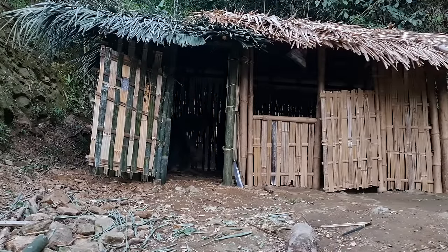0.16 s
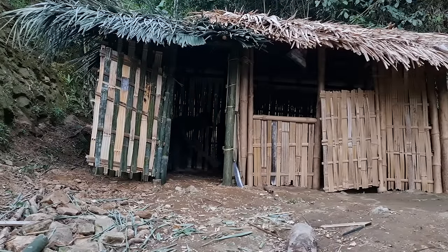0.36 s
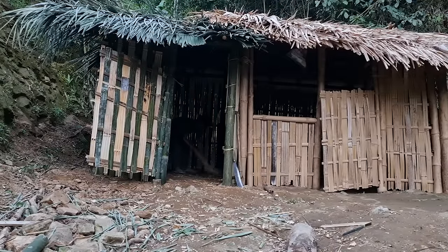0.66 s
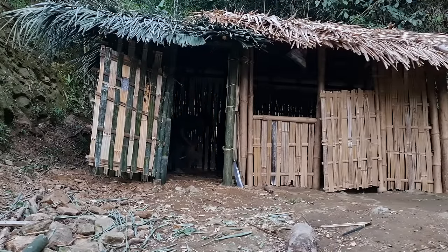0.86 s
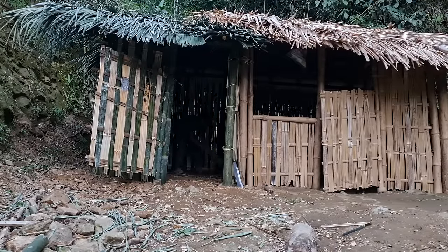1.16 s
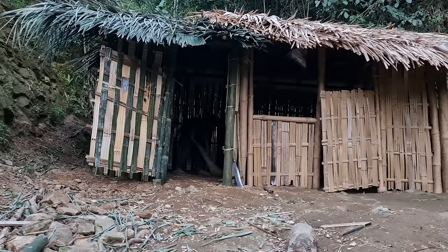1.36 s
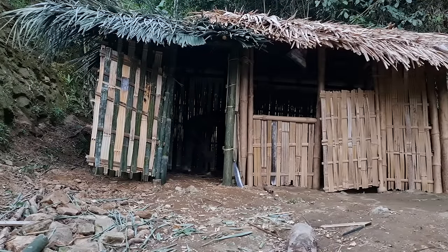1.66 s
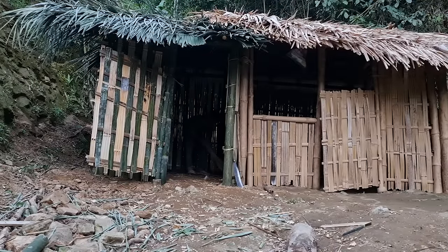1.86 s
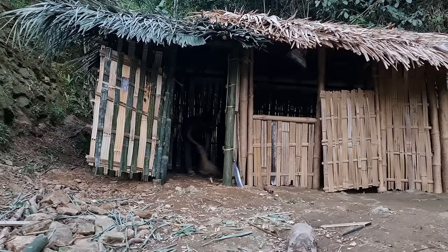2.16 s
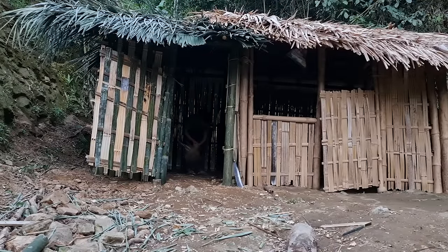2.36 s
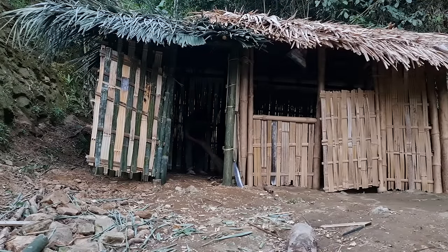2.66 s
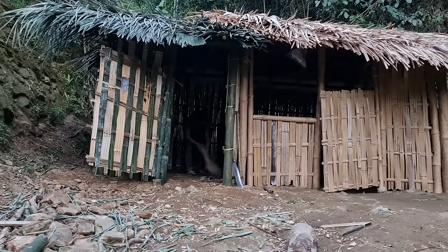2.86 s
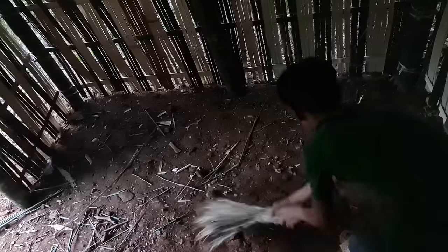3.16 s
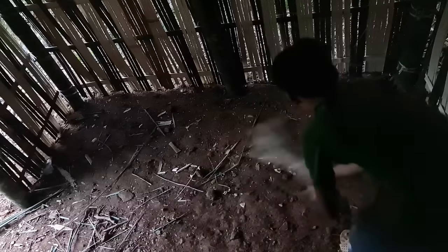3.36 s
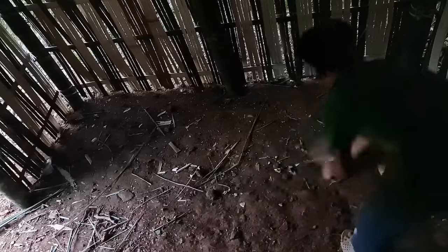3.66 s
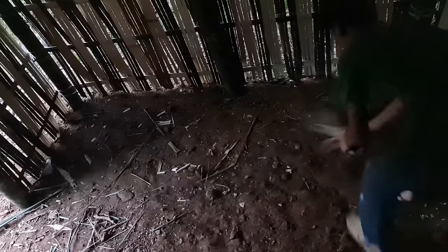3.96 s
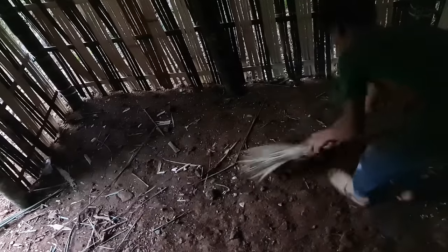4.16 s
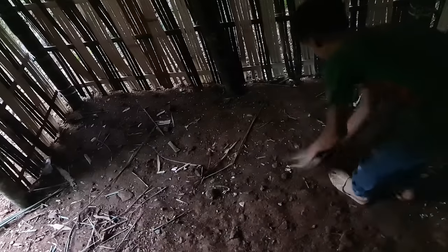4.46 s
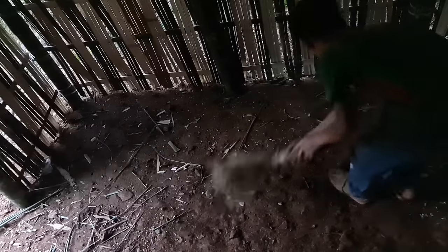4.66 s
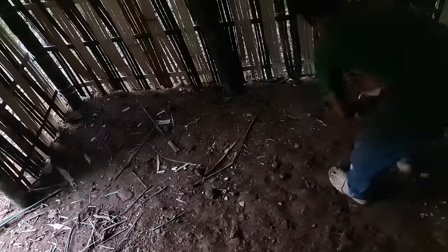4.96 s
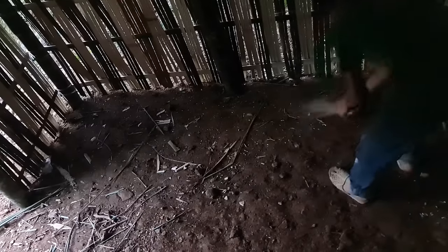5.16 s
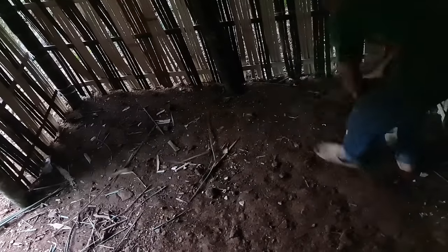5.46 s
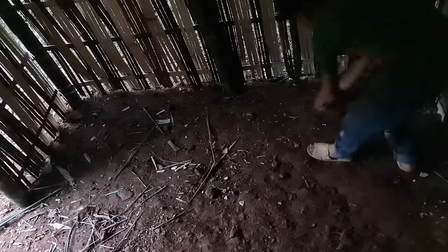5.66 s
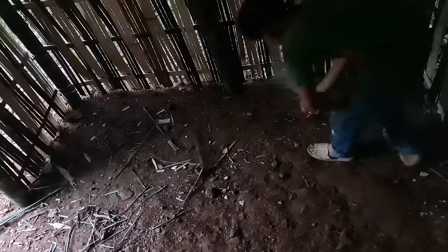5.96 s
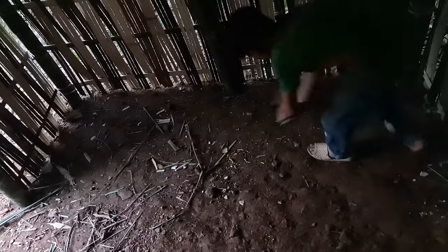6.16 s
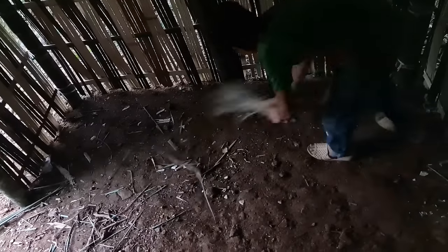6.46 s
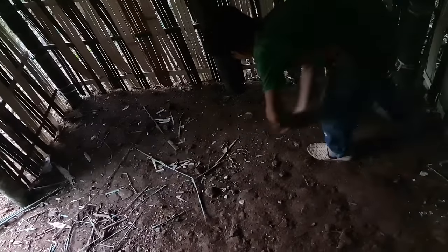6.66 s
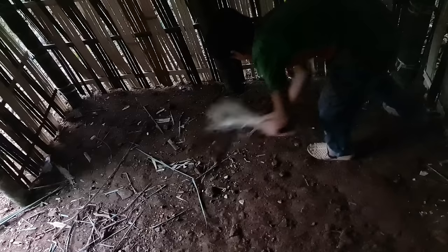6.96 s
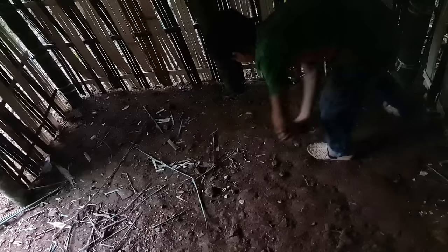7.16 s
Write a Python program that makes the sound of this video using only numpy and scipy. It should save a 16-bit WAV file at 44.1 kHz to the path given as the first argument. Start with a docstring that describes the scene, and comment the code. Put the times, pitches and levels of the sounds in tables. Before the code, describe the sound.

From a quiet yard with faint trilling insects, short straw-broom strokes come from inside a bamboo hut, with small knocks and twig snaps. Around three seconds the view jumps inside: the strokes become louder, close and crisp, scraping dry earth, with crackling leaves, ticking chips and a heavier thud near the end. Wide stereo microphone, little echo.

```python
"""Sweeping a hut floor

A short straw hand broom sweeps a dirt floor strewn with dry leaves and chips in a small bamboo hut.
The first strokes are heard from the yard, with insects trilling; then the listener is inside, close by.
Each stroke is a rush of random straw clicks over a duller scrape of earth, both following the broom's pressure.
Twigs snap and feet and clods thud as short noise bursts that ring; insects are pulsed tones and narrow noise."""
import sys
import numpy as np
from scipy import signal
from scipy.fft import rfft, irfft
from scipy.io import wavfile

SR = 44100
rng = np.random.default_rng(int(sys.argv[2]) if len(sys.argv) > 2 else 0)


def wav_record(signal):
    """Record a signal, one row per channel, as 16-bit PCM in the file named by sys.argv[1]."""
    frames = np.transpose(np.atleast_2d(signal))
    bounded = np.clip(frames, -1, 1)
    # unit amplitude maps onto the largest positive 16-bit level
    quanta = np.round(bounded * 32767).astype(np.int16)
    wavfile.write(sys.argv[1], SR, quanta)


N = 322812
TIME = np.arange(N) / SR
INSIDE_FROM_S = 2.912
# 0 in the yard, 1 in the hut, with a 2 ms crossfade
INSIDE = np.clip((TIME - INSIDE_FROM_S) * 500, 0, 1)

# full broom strokes: touch-down t/s, hardest push t/s, lift t/s, straw rustle level/dB, earth scrape level/dB,
# swell from touch-down to push/dB
STROKES = [(-0.033, 0.051, 0.098, -35.5, -43.5, 7.5), (0.592, 0.737, 0.81, -38.5, -47, 8.5),
           (1.311, 1.338, 1.46, -40.5, -48.5, 7), (1.437, 1.474, 1.457, -29.5, -38, 9),
           (2.066, 2.202, 2.228, -33, -41, 12.0), (2.836, 2.898, 2.925, -37.5, -46.5, 9),
           (3.034, 3.13, 3.212, -24.5, -34.5, 12), (3.664, 3.767, 3.86, -26.5, -36.5, 6.5),
           (4.072, 4.199, 4.252, -24.5, -35.5, 13.5), (4.504, 4.673, 4.677, -25.5, -38, 4.0),
           (5.093, 5.258, 5.303, -28.5, -41.0, 12), (5.679, 5.812, 5.897, -27.0, -39.5, 10),
           (6.185, 6.291, 6.46, -28, -42.5, 7), (6.727, 6.808, 7, -27.0, -38.5, 10.5),
           (7.224, 7.319, 7.36, -29.5, -39.5, 15)]
# how alike left and right are in the yard: f/Hz, correlation (-1 to 1)
YARD_LIKENESS = [(100, 0.79), (500, 0.57), (1500, 0.33), (4500, 0.12), (5600, -0.032), (8000, -0.31),
                 (10400, -0.015), (13000, -0.23)]


def from_db(db):
    """Turns decibels into an amplitude factor."""
    return 10 ** (np.asarray(db) / 20)


def rms_one(x):
    """Scales a sound to an average (rms) strength of 1."""
    return x / np.sqrt(np.mean(x ** 2) + 1e-20)


def at_hz(points):
    """Reads a table at every spectral line, along a log-frequency axis."""
    hz, value = np.transpose(points)
    line_hz = np.arange(N // 2 + 1) * SR / N
    return np.interp(np.log(line_hz + 1), np.log(hz), value)


def coloured(x, points):
    """Makes some frequencies of a sound stronger and others weaker, as a table says."""
    return irfft(rfft(x) * from_db(at_hz(points)), N)


def drift(rate):
    """A line wandering at random through a given number of points per second, with rms 1."""
    knots = rng.standard_normal(4000)
    return rms_one(np.interp(TIME * rate, np.arange(len(knots)), knots))


def blend(pair, likeness):
    """Mixes two signals into left and right; if they are unrelated, the sides get the given likeness."""
    mid, side = rfft(pair)
    alike = np.clip(at_hz(likeness), -.98, .98)
    shared = np.sqrt((1 + alike) / 2) * mid
    opposed = np.sqrt((1 - alike) / 2) * side
    return irfft(shared + opposed * [[1], [-1]], N)


def resonate(x, hz, width_hz):
    """A two-pole resonance: the sound rings around one frequency, with gain 1 at the top."""
    r = np.exp(-np.pi * width_hz / SR)
    forward = [(1 - r * r) / 2, 0, (r * r - 1) / 2]
    feedback = [1, -2 * r * np.cos(2 * np.pi * hz / SR), r * r]
    return signal.lfilter(forward, feedback, x + 1e-18)


def clicks(per_s, spread_db):
    """Random clicks of uneven size, drawn separately for two paths to the listener."""
    size_db = spread_db * np.minimum(rng.exponential(1, (2, N)), 4)
    sizes = from_db(size_db) * rng.choice([-1, 1], (2, N))
    happens = rng.random((2, N)) < per_s / SR
    return rms_one(sizes * happens)


def walls(pair, wet_db, t60, count=40):
    """The slatted walls return a short scatter of echoes, the later ones weaker."""
    delay = rng.uniform(.002, .06, (2, count))  # s
    heights = rng.choice([-1, 1], (2, count)) * from_db(-60 * delay / t60)
    response = np.zeros((2, SR // 8))
    for side in range(2):
        echoes = from_db(wet_db) * heights[side] / np.linalg.norm(heights[side])
        response[side, (delay[side] * SR).astype(int)] = echoes
    response[:, 0] = 1  # the direct sound
    return signal.fftconvolve(pair, response, axes=1)[:, :N]


def blow(t60, direct, count=13000):
    """One contact and the dense reflections that die away after it, by 60 dB in t60 seconds."""
    age = np.arange(count) / SR
    burst = rng.standard_normal((2, count)) * from_db(-60 * age / max(t60, .01))
    burst[:, 0] += direct
    return burst


def add(track, s, sound):
    """Lays a sound into a track at a time in seconds."""
    at = int(s * SR)
    track[:, at:at + sound.shape[1]] += sound[:, :N - at]


def broom():
    """Thousands of straws flick over grit; leaves and chips crackle among them; pressing down scrapes the earth."""
    # colour of the straws and leaves: f/Hz, gain/dB
    straw_colour = [(400, -33.5), (900, -17.5), (1400, -5.5), (2100, -5), (2900, -0.5), (4200, 0.5),
                    (7000, 1), (9200, -5.5), (11200, -4.5), (13000, -6), (16000, -9)]
    # colour of the scraped earth: f/Hz, gain/dB
    earth_colour = [(25, -47), (60, -30), (150, -11), (240, -11), (360, -0.5), (550, 1), (850, 3.5),
                    (1400, 5), (2100, 0.5), (2900, 2.5), (5000, -11), (12000, -15)]
    straw_level, earth_level = sweeping()
    # uneven pressure makes both levels flutter
    straw_level = straw_level * from_db(0.86 * drift(110))
    earth_level = earth_level * from_db(1.23 * drift(130))

    straws = coloured(clicks(per_s=14000, spread_db=2.5), straw_colour)
    leaf_clicks = walls(clicks(per_s=170, spread_db=3.5), wet_db=-1, t60=0.047)
    leaves = rms_one(coloured(leaf_clicks, straw_colour))
    grit = coloured(clicks(per_s=4000, spread_db=2.5), earth_colour)

    rush = from_db(-0.45) * straw_level * wander(straws, depth=0.36, rate=14)
    scrape = from_db(4.5) * earth_level * wander(grit, depth=0.67, rate=18)
    # loose litter keeps settling after the broom lifts, so its crackle falls off less than the rush
    stirred = (straw_level / straw_level.max()) ** 0.87
    crackle = from_db(-37) * leaves + from_db(-41.5) * chips(per_s=32)
    return rush + scrape + stirred * crackle


def sweeping():
    """Levels of straw rustle and earth scrape: strokes, settling litter and light drags add in power."""
    # light drags between strokes: touch-down t/s, length/s, straw rustle level/dB, earth scrape level/dB
    drags = [(1.609, 0.033, -55, -55.5), (2.3, 0.13, -57, -59), (3.352, 0.099, -40, -63.5),
             (4.326, 0.013, -41, -47.0), (4.402, 0.096, -39.5, -61.5), (4.846, 0.1, -36, -62),
             (5.586, 0.16, -44, -54), (6.11, 0.077, -37, -49), (6.688, 0.14, -38, -55),
             (7.181, 0.074, -48, -49)]
    # faint stirring of litter that never stops: straw rustle dB, earth scrape dB
    yard_stir_db, hut_stir_db = (-67, -84), (-47.5, -67.5)
    # swept litter goes on settling: dB against the stroke's peak, fall in dB per s
    settle_db, settle_db_per_s = -19, 36
    earth_follows = 1.33  # dB of scrape for each dB of rustle

    def power(straw_db, earth_db, shape_db):
        """Power of rustle and scrape as they follow one shape in time."""
        return from_db([straw_db + shape_db, earth_db + earth_follows * shape_db]) ** 2

    total = np.outer(from_db(yard_stir_db) ** 2, 1 - INSIDE)
    total += np.outer(from_db(hut_stir_db) ** 2, INSIDE)
    for touch, push, lift, straw_db, earth_db, swell_db in STROKES:
        # a stroke sounds only in the place where it began
        heard = INSIDE if touch > INSIDE_FROM_S else 1 - INSIDE
        settling_db = settle_db - settle_db_per_s * np.maximum(TIME - lift, 0)
        total += heard * power(straw_db, earth_db, contact_db(touch, push, lift, swell_db))
        total += heard * (TIME > push) * power(straw_db, earth_db, settling_db)
    for touch, length, straw_db, earth_db in drags:
        total += power(straw_db, earth_db, contact_db(touch, touch, touch + length, 0))
    return np.sqrt(total)


def contact_db(touch, push, lift, swell_db):
    """The broom lands, swells to its hardest push, eases and lifts: dB against its peak."""
    landing_db_per_s, ease_db, lift_db_per_s = 800, 5, 198
    pressed = np.interp(TIME, [touch, push, lift], [-swell_db, 0, -ease_db])
    before_landing = landing_db_per_s * np.maximum(touch - TIME, 0)
    after_lift = lift_db_per_s * np.maximum(TIME - lift, 0)
    return pressed - before_landing - after_lift


def wander(x, depth, rate, count=22):
    """As the broom travels, the hut's reflections lift and sink narrow bands of its sound."""
    centres_hz = np.geomspace(330, 4600, count)
    bands = sum(drift(rate) * resonate(x, hz, 0.077 * hz) for hz in centres_hz)
    return rms_one(x + depth * bands)


def chips(per_s, count=10):
    """Chips and leaf stalks tumble, each tick ringing at one of several pitches."""
    ticks = clicks(per_s, spread_db=1.0)
    dealt = rng.integers(0, count, N)  # which pitch each tick gets
    pitches_hz = np.geomspace(1100, 8500, count)
    rings = sum(resonate(ticks[0] * (dealt == k), hz, 0.075 * hz) for k, hz in enumerate(pitches_hz))
    return rms_one(walls(np.array([rings, rings]), wet_db=-1, t60=0.074))


def cracks():
    """Twigs snap and straw tips tick: a fast-rising noise burst rings broadly around a pitch of its own."""
    # twigs and chips cracking, plus a duller tick as the broom lands at 2.836 s: t/s, level/dB, centre f/Hz
    snaps = [(0.3713, -44.5, 1330), (0.988, -47.5, 3020), (1.072, -29.5, 2280), (1.7894, -39, 3100),
             (1.84, -36.5, 5530), (2.2637, -30.5, 1400), (2.351, -41, 2870), (2.4054, -44.5, 1140),
             (2.836, -41, 1220), (3.386, -24.5, 6860), (3.4199, -16.5, 6000), (3.533, -17.5, 3000),
             (3.6042, -28.5, 3900), (4.0356, -28.5, 5350), (4.4343, -33.5, 1430), (4.796, -27.5, 4950),
             (4.861, -24, 3800), (4.9089, -18.5, 6100), (5.4011, -34.5, 4600), (5.4983, -36.5, 6000),
             (5.5483, -25.5, 5100), (6.115, -37, 7300), (6.49, -34, 1920), (6.617, -36.5, 2400),
             (6.969, -26, 6000), (7.0254, -21, 1470), (7.1824, -23.5, 5470)]
    # the straw tips tick as each stroke lands
    tip_db, tip_hz = -39.5, 6000
    tips = [(touch, tip_db, tip_hz) for touch, *_ in STROKES if touch > 0]
    out = np.zeros((2, N))
    for s, level_db, hz in snaps + tips:
        burst = blow(t60=0.13, direct=3.9)
        rise_s = 0.0011 * (hz / 6500) ** 2
        age = np.arange(1, burst.shape[1] + 1) / SR
        burst = burst * (1 - np.exp(-age / rise_s))
        ring = resonate(burst, hz, 0.78 * hz) + from_db(-12.0) * burst
        band = signal.butter(2, [700, min(2.7 * hz, .4 * SR)], "band", fs=SR, output="sos")
        ring = signal.sosfilt(band, ring)
        strength = ring[:, :SR // 100].std()  # over the first 10 ms
        add(out, s, from_db(level_db - 10.0) * ring / strength)
    return out


def thuds():
    """A soft contact sets earth and bamboo ringing, most near its own pitch; low modes die last."""
    # feet, clods and broom head knocking on floor and wall: t/s, level/dB, contact f/Hz,
    # time to fall 60 dB/s (for a mode at 550 Hz)
    knocks = [(0.108, -44, 417, 0.12), (0.371, -61.5, 1330, 0.23), (0.906, -37, 624, 0.14),
              (1.074, -42, 640, 0.19), (1.23, -59.5, 499, 0.24), (1.774, -59, 387, 0.14),
              (2.262, -32, 610, 0.15), (2.309, -41, 616, 0.1), (2.4, -52.5, 630, 0.14),
              (2.543, -57.5, 428, 0.14), (3.422, -50, 700, 0.27), (3.531, -42.5, 1840, 0.13),
              (3.601, -44, 576, 0.31), (3.966, -46, 2300, 0.097), (4.433, -36, 1390, 0.21),
              (4.86, -40, 625, 0.19), (5.007, -53, 171, 0.18), (5.349, -45.5, 633, 0.13),
              (6.49, -36.5, 660, 0.11), (7.0243, -20.5, 690, 0.17), (7.036, -26, 347, 0.18)]
    # what a knock rings with: f/Hz, width/Hz, level/dB
    modes = [(189, 28, -8.5), (385, 125, -8.5), (488, 130, -0.5), (615, 73, 2), (783, 140, 0),
             (906, 73, -8), (1220, 140, -3), (1780, 720, -6)]
    out = np.zeros((2, N))
    for s, level_db, hz, t60 in knocks:
        band = signal.butter(2, [min(0.39 * hz, 290), 2.0 * hz], "band", fs=SR, output="sos")
        soften = signal.butter(2, 2.27 * hz, fs=SR, output="sos")
        contact = np.vstack([band, soften])
        ring = 0
        for mode_hz, width_hz, db in modes:
            mode_t60 = t60 * (550 / mode_hz) ** 0.5
            push = signal.sosfilt(contact, blow(mode_t60, direct=rng.choice([-1, 1]) * 6.1))
            octaves_away = abs(np.log2(mode_hz / hz))
            strength = from_db(db - 2.2 * octaves_away + rng.normal(0, 0.67))
            ring = ring + strength * resonate(push, mode_hz, width_hz)
        add(out, s, from_db(level_db - 7.5) * ring / ring[:, :SR // 40].std())  # strength over 25 ms
    return out


def shuffle():
    """Shoes and clothes shift softly as the sweeper moves along: noise with an uneven level."""
    # colour of shoes and clothes: f/Hz, gain/dB
    cloth_colour = [(30, -25), (90, -8), (170, -3.5), (330, 6.5), (600, 4), (1500, -25)]
    rustle = rms_one(coloured(rng.standard_normal((2, N)), cloth_colour))
    return from_db(-69 + 2.3 * drift(11)) * rustle


def in_hut(x):
    """Close by, the hut's resonances stand out and left and right are coloured differently."""
    # resonances of the hut: f/Hz, width/Hz, level/dB
    hut_modes = [(416, 39, -7.5), (510, 11, -40), (740, 110, -8), (940, 47, -9.5), (1433, 74, -5),
                 (1840, 99, -7.5), (3000, 350, -17)]
    # how alike left and right are inside: f/Hz, correlation (-1 to 1)
    hut_likeness = [(100, .8), (330, 0.78), (520, -0.21), (1000, -0.068), (1700, -0.13), (15000, -0.0077)]
    # colour that differs between the sides: f/Hz, left minus right level/dB
    balance = [(100, -0.5), (380, -3.5), (650, 0), (900, -3), (2000, -0.4), (3800, -2.5), (5200, 0.5),
               (7100, -3.5), (8000, 2.5), (9500, -1.5), (11300, -12), (13000, 7), (15500, -8)]
    rung = x + sum(from_db(db) * resonate(x, hz, width_hz) for hz, width_hz, db in hut_modes)
    left, right = blend(from_db(-0.39) * rung, hut_likeness)
    half_balance = np.array(balance) * [1, .5]  # each side takes half the difference
    return np.array([coloured(left, half_balance), coloured(right, half_balance * [1, -1])])


def through_door(x):
    """On its way out to the yard, the sound changes colour and its two sides grow partly alike."""
    # colour of the way out: f/Hz, gain/dB
    door_colour = [(100, 10.5), (350, 2), (700, -1.5), (1500, -1.5), (3000, -1.5), (6500, -0.5), (9000, -2),
                   (11500, -2), (15500, -5.5)]
    return coloured(blend(x, YARD_LIKENESS), door_colour)


def insects():
    """Wing strokes pulse a narrow resonance; two insects trill on, the lowest sings short rising phrases."""
    # insects in the bushes: f/Hz, width/Hz, pulse rate/(1/s), pulse depth (0-1), level/dB
    singers = [(6530, 140, 63, 0.86, -67.5), (5280, 86, 49, .7, -74.5), (4390, 58, 73, 0.4, -67)]
    # when the lowest insect calls: start t/s, end t/s
    calls = [(.32, .51), (1.0, 1.15), (1.66, 1.8), (1.97, 2.1), (2.33, 2.46), (2.62, 2.82)]
    phrases, rise_hz = np.zeros(N), np.zeros(N)
    for start, end in calls:
        progress = np.clip((TIME - start) / (end - start), 0, 1)
        phrases += np.sqrt(4 * progress * (1 - progress))
        rise_hz += 300 * (progress - .5) * ((TIME > start) & (TIME < end))
    out = 0
    for singer, singing, bend_hz in zip(singers, [1, 1, phrases], [0, 0, rise_hz]):
        hz, width_hz, per_s, depth, db = singer
        strokes = np.cumsum(per_s * (1 + 0.073 * drift(35.1))) / SR
        pulses = 1 - min(depth, 1) * np.cos(np.pi * strokes) ** 2
        pulses = pulses * from_db(1.7 * drift(45))
        pitch_hz = hz + bend_hz + 0.316 * width_hz * drift(150)
        tone = np.sin(2 * np.pi * np.cumsum(pitch_hz) / SR)
        scattered = rms_one(resonate(rng.standard_normal((2, N)), hz, width_hz))
        out = out + from_db(db) * singing * rms_one(pulses * (tone + 1.4 * scattered))
    return out


def outdoor_air():
    """The steady sound of the open air: coloured noise with rms 1."""
    # colour of the air: f/Hz, gain/dB
    air_colour = [(20, -10), (40, -14), (65, 6), (110, 0.5), (180, -11), (400, -12.5), (1000, -17),
                  (3000, -32), (4000, -4), (6000, -16), (9000, -34), (16000, -36)]
    noise = blend(rng.standard_normal((2, N)), YARD_LIKENESS)
    return rms_one(coloured(noise, air_colour))


def scene():
    """The same work is heard first through the doorway, then from inside."""
    work = broom() + cracks() + thuds()
    air = outdoor_air()
    yard = through_door(work) + insects() + from_db(-70.5) * air
    hut = in_hut(work + shuffle()) + from_db(-76) * air
    yard_balance = from_db([[-.3], [.3]])  # left, right
    return (1 - INSIDE) * yard * yard_balance + INSIDE * hut


def record(dry):
    """Everything above 15.9 kHz is cut steeply."""
    cutoff_hz = 15900
    low_pass = signal.ellip(12, .1, 85, cutoff_hz, fs=SR, output="sos")
    return signal.sosfilt(low_pass, dry)


dry = scene()
out = record(dry)
wav_record(out)
```